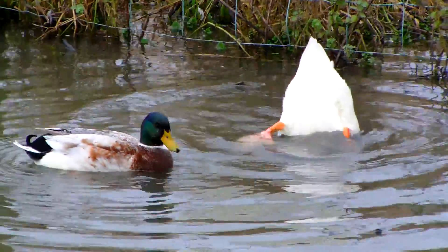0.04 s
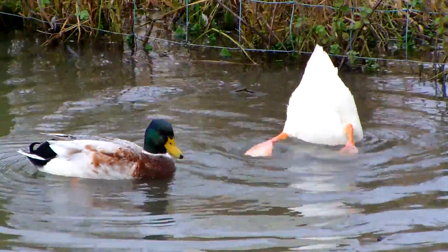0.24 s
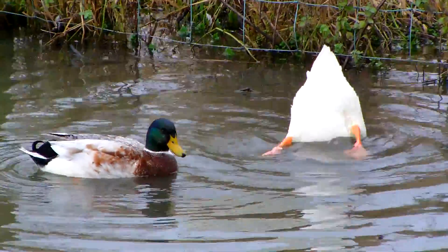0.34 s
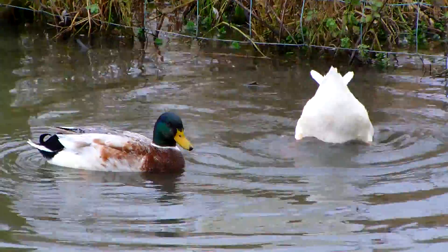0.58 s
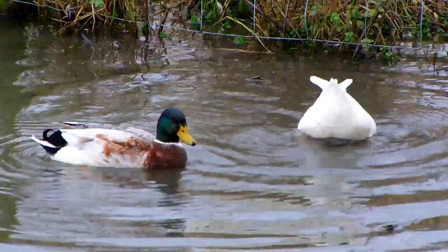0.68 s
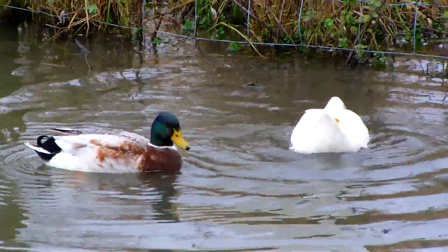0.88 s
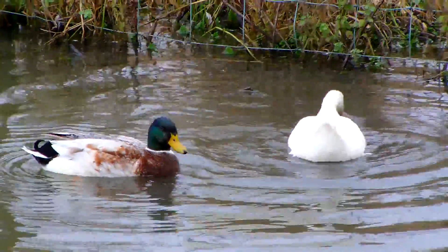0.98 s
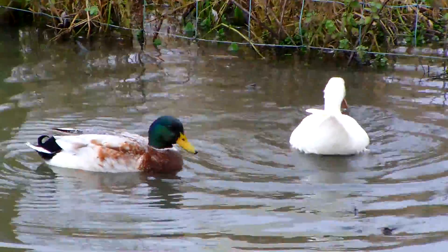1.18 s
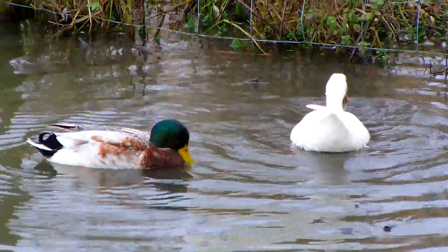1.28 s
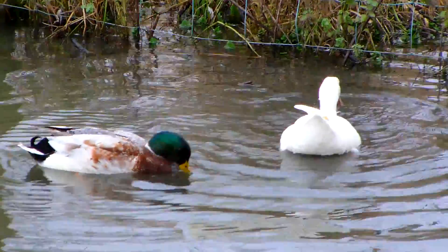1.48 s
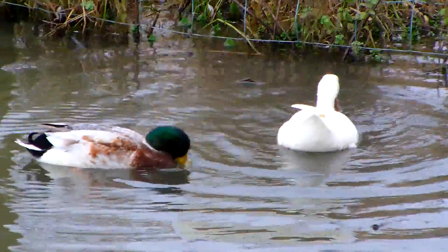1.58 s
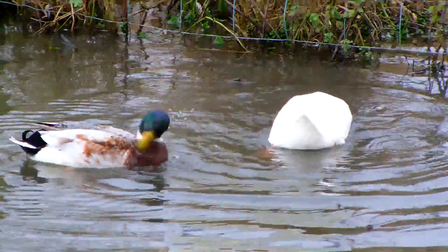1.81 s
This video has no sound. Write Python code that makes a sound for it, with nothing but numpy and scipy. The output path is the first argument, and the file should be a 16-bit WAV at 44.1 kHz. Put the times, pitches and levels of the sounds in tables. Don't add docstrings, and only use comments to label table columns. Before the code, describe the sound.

Single raspy duck call on a pond, echoing briefly, amid water splashes and faint distant birds

```python
import sys
import numpy as np
from scipy import signal
from scipy.fft import rfft, irfft
from scipy.io import wavfile
from scipy.ndimage import uniform_filter1d

SR = 44100
rng = np.random.default_rng(int(sys.argv[2]) if len(sys.argv) > 2 else 0)


def store_pcm(level_fs):
    pcm = np.round(np.clip(level_fs, -1, 1) * 32767).astype(np.int16)
    wavfile.write(sys.argv[1], SR, np.atleast_2d(pcm).T)


def rack_gain(trim_db):
    fader = np.asarray(trim_db, float)
    return 10 ** (fader / 20)


N = 81585

# (time [s], lowest pitch of warble [Hz], warble depth [share of pitch], level [dB],
# whistle resonance [dB])
CALL = [
    (.239, 640, .0, -60, -30),
    (.2445, 800, .2, -37.5, -28),
    (.274, 836, .178, -34.5, -14),
    (.304, 810, .16, -36.5, -8),
    (.365, 797, .1, -36, 1),
    (.392, 772, .05, -38.5, -2),
    (.436, 690, .02, -39.5, -1),
    (.447, 655, .0, -48, -8),
    (.475, 580, .0, -60, -30),
]
# (centre [Hz], width [Hz], level [dB])
THROAT = [(780, 400, -9), (1000, 300, -4.5), (1750, 900, -3), (2550, 450, -4), (3500, 700, -11),
          (4900, 450, -12), (5650, 550, -15), (7000, 1600, -20)]
# (centre [Hz], width [Hz], level [dB])
WHISTLE = [(2180, 450, -1), (13700, 4600, -26)]
# (centre [Hz], width [Hz], level [dB], opens [s], closes [s])
BILL = [(3500, 650, -8, .24, .385), (4850, 300, -13, .262, .398), (5650, 420, -9, .266, .395),
        (7500, 450, -9, .264, .3), (10800, 250, -16, .266, .28), (9720, 300, -10, .297, .322),
        (8780, 260, -1, .324, .45), (9500, 700, -15, .305, .41), (7000, 500, -16, .372, .41),
        (6550, 450, -13, .416, .434)]
# (centre [Hz], width [Hz], level [dB])
ECHO_COLOUR = [(780, 300, -5), (1420, 220, 0), (2200, 330, 5), (2200, 3000, -9), (8800, 1500, -3)]
# (time [s], rise [s], fade [s], level [dB])
SPLASHES = [
    (0, 0.0089, 0.054, -55),
    (0.133, 0.019, 0.74, -54),
    (.65, 0.02, 0.078, -63),
    (0.864, 0.0049, 0.026, -62.5),
    (1.0, 0.029, 0.13, -61.5),
    (1.385, 0.056, 0.16, -54),
    (1.8, 0.064, 0.39, -63),
]
# (frequency [Hz], level [dB per Hz])
SPLASH_COLOUR = [(300, -21.5), (1400, -11), (2300, -2.5), (3300, -4), (4800, -2.5), (8000, -1.5),
                 (9500, -7.5), (11500, -26)]
# (centre [Hz], width [Hz], level [dB])
FAR_CALL_BANDS = [(1090, 200, -4), (2200, 500, -1), (3200, 400, -1), (4650, 600, -2), (6800, 600, -3)]
# (time [s], pitch [Hz], ring [s], level [dB])
PLOPS = [(1.338, 1080, 0.04, -63.5), (1.348, 3150, .02, -60), (1.383, 3130, .022, -54),
         (1.374, 3400, .014, -57), (1.408, 2300, 0.025, -58), (.635, 1089, .03, -65),
         (.861, 5900, .004, -50), (.862, 7100, .003, -51), (.879, 5800, .004, -51), (.88, 6700, .003, -52),
         (.932, 7900, 0.004, -54), (1.762, 2120, 0.0071, -55.5), (1.797, 2500, 0.012, -60),
         (1.311, 1450, 0.004, -56), (1.343, 2350, 0.007, -56), (1.378, 6900, .007, -54),
         (1.386, 4800, .005, -53), (1.38, 2200, .006, -56), (1.46, 4600, .005, -56),
         (.797, 6300, .012, -60), (.868, 2050, .006, -58), (1.738, 6000, .008, -60),
         (1.834, 6000, .008, -59), (.017, 2100, .008, -58), (1.425, 4600, .012, -57),
         (.664, 3000, .02, -60), (.163, 3200, .016, -59), (.135, 3000, .012, -59), (.125, 6650, .008, -59),
         (1.349, 9700, .002, -55)]
# (time [s], pitch [Hz], level [dB])
COO = [
    (0.722, 669, -85),
    (.76, 787, -61),
    (0.783, 851, -68.5),
    (0.821, 739.6, -70),
    (0.859, 790, -68),
    (.96, 840, -72.5),
    (1.011, 799, -65),
    (1.09, 805, -74),
    (1.14, 795, -78),
]
# (time [s], length [s], top pitch [Hz], sag [Hz], level [dB])
PEEPS = [
    (1.48, .135, 4000, 45, -67),
    (1.752, .08, 4130, 130, -65.5),
    (1.18, .07, 610, 20, -72),
    (.61, .13, 3350, 60, -67),
    (.9, .1, 1950, 90, -68),
]
# (frequency [Hz], level [dB per Hz])
HISS_COLOUR = [(20, 8.5), (60, -8.5), (310, -18), (720, -5.5), (2200, -9), (7500, -8.5), (10500, -17),
               (15900, -20.5)]

WARBLE_TOP_S, WARBLE_HZ, WARBLE_RISE_HZ_PER_S2 = .256, 31.8, 300
WARBLE_SHARP, WARBLE_LEAN = 1.5, -.15
WARBLE_DIP_DB, WARBLE_DULL_DB, DULL_ABOVE_HZ = -1.5, -5, 4800
JITTER, ROUGH_ABOVE_HZ, SHIMMER_DB = .004, 9000, 1.8
BREATH_DB, WHEEZE_DB = -17, -12.5
CATCH_DB, CATCH_FROM_S, CATCH_SHARP = -7, .3, 14
BILL_EDGE_S = .003
ECHO_DB, ECHO_T60_S, ECHO_GAP_S = -12.5, .55, .014
DROPS_PER_S, DROPS_DB, DROP_CYCLES = 2000, -5, 9
HISS_DB = -59
NOTCH_HZ, NOTCH_WIDTH_HZ, NOTCH_DB = 905, 52, -19

SPECTRUM_HZ = np.arange(N // 2 + 1) * SR / N


def level(x, db):
    return x * rack_gain(db) / np.sqrt(np.mean(x ** 2))


def walk(rate):
    hold = int(SR / rate)
    steps = np.repeat(rng.standard_normal(N // hold + 1), hold)
    return 1.35 * uniform_filter1d(uniform_filter1d(steps, hold), hold)[:N]


def reshape(x, gain):
    return irfft(rfft(x) * gain, N)


def colour(x, points):
    hz, db = np.array(points).T
    f = np.maximum(SPECTRUM_HZ, 1)
    return reshape(x, rack_gain(np.interp(np.log(f), np.log(hz), db)))


def resonate(hz, peaks):
    return np.sqrt(sum(rack_gain(db) ** 2 / (1 + (2 * (hz - f) / w) ** 2) ** 2 for f, w, db in peaks))


def waterfowl(t):
    _, low, depth, db, whistle_db = (np.interp(t, np.array(CALL)[:, 0], c) for c in np.array(CALL).T)
    u = t - WARBLE_TOP_S
    turn = 2 * np.pi * (WARBLE_HZ * u + WARBLE_RISE_HZ_PER_S2 * u ** 3 / 3)
    swing = np.tanh(WARBLE_SHARP * (np.cos(turn) + WARBLE_LEAN))
    up = (swing - swing.min()) / np.ptp(swing)
    hz = low * (1 + depth * up + JITTER * walk(300))
    phase = 2 * np.pi * np.cumsum(hz) / SR

    opened = []
    for *_, opens, closes in BILL:
        outside = np.maximum(opens - t, t - closes) / BILL_EDGE_S
        opened.append(1 / (1 + np.exp(np.clip(outside, -30, 30))))
    catching = (t > CATCH_FROM_S) * (t < CALL[-3][0] - .02)
    catch_db = CATCH_DB * np.exp(CATCH_SHARP * (np.cos(turn) - 1)) * catching

    voice = 0
    for k in range(1, 23):
        f = k * hz
        gain = resonate(f, THROAT) + rack_gain(whistle_db) * resonate(f, WHISTLE)
        gain = gain * rack_gain(WARBLE_DULL_DB * up / (1 + (DULL_ABOVE_HZ / f) ** 4))
        for is_open, row in zip(opened, BILL):
            if abs(row[0] / k - 830) < 330:
                gain = gain + is_open * resonate(f, [row[:3]])
        gain = gain * rack_gain(catch_db + SHIMMER_DB * walk(148.3)) * (f < .45 * SR)
        roughness = (f / ROUGH_ABOVE_HZ) ** 2 * walk(500)
        voice = voice + gain * np.sin(k * phase + rng.uniform(0, 2 * np.pi) + roughness)

    breath = reshape(rng.standard_normal(N), resonate(SPECTRUM_HZ, THROAT[2:]))
    air = rng.standard_normal(N)
    wheeze = 0
    for is_open, row in zip(opened, BILL):
        wheeze = wheeze + is_open * level(reshape(air, resonate(SPECTRUM_HZ, [row[:3]])), row[2])
    breath = level(breath, BREATH_DB) * rack_gain(WARBLE_DULL_DB * up / 2) + wheeze * rack_gain(WHEEZE_DB)
    puffs = 1 + np.cos(phase)
    calling = (t > CALL[0][0]) & (t < CALL[-1][0])
    return (voice + breath * puffs) * rack_gain(db + WARBLE_DIP_DB * up) * calling


def banks(x, t):
    fade = rack_gain(-60 * t / ECHO_T60_S) * np.clip(t / ECHO_GAP_S - 1, 0, 1)
    tail = rng.standard_normal(N) ** 3 * fade
    echo = signal.fftconvolve(x, tail / np.sqrt(np.sum(tail ** 2)))[:N]
    return rack_gain(ECHO_DB) * reshape(echo, resonate(SPECTRUM_HZ, ECHO_COLOUR))


def bubble(hz, ring_s, gain):
    u = np.arange(int(2 * ring_s * SR)) / SR
    tone = np.sin(2 * np.pi * hz * u * (1 + .025 * u / ring_s))
    return gain * tone * np.exp(-2.5 * u / ring_s) * np.minimum(u / .0015, 1)


def add(out, s, x):
    i = int(s * SR)
    out[i:i + len(x)] += x[:N - i]


def splashes(t):
    swell = 0
    for s, rise, fade, db in SPLASHES:
        shape = np.where(t < s, np.exp(-((t - s) / rise) ** 2), np.exp(-(t - s) / fade))
        swell = swell + rack_gain(db) * shape
    drops = np.zeros(N)
    for when, pitch, size in rng.random((int(DROPS_PER_S * N / SR), 3)):
        hz = 900 * 11 ** pitch
        add(drops, when * N / SR, bubble(hz, DROP_CYCLES / hz, rack_gain(6 * size ** 2) * np.sqrt(hz)))
    spray = rng.standard_normal(N) + level(drops, DROPS_DB)
    spray = reshape(spray, .5 + resonate(SPECTRUM_HZ, FAR_CALL_BANDS))
    return level(colour(spray, SPLASH_COLOUR), 0) * swell * rack_gain(1.2 * walk(30))


def plops():
    out = np.zeros(N)
    for s, hz, ring_s, db in PLOPS:
        add(out, s, bubble(hz, ring_s, 2 * rack_gain(db)))
    return out


def far_birds(t):
    s, hz, db = np.array(COO).T
    coo_db = np.interp(t, s, db, -120, -120) + 3 + 1.2 * walk(40)
    out = np.sin(2 * np.pi * np.cumsum(np.interp(t, s, hz)) / SR) * rack_gain(coo_db)
    for s, length, top, sag, db in PEEPS:
        u = np.clip((t - s) / length, 0, 1)
        hz = top - sag * (2.7 * u - 1.1) ** 2
        peep = np.sin(2 * np.pi * np.cumsum(hz) / SR) * np.sin(np.pi * u) ** .5
        out = out + peep * rack_gain(db + 3 + 1.2 * walk(60))
    return out


def water_and_wind():
    noise = rfft(colour(rng.standard_normal(N), HISS_COLOUR))
    octave = np.log2(np.maximum(SPECTRUM_HZ, 1) / 16)
    out = 0
    for k in range(11):
        flicker = rack_gain(.6 * walk(4) + 1.3 * walk(18))
        out = out + flicker * irfft(noise * np.clip(1 - abs(octave - k), 0, 1), N)
    above = signal.sosfilt(signal.butter(2, 300, "high", fs=SR, output="sos"), out)
    return out * rack_gain(HISS_DB) / np.std(above)


def scene():
    t = np.arange(N) / SR
    call = waterfowl(t)
    mono = call + banks(call, t) + water_and_wind() + splashes(t) + plops() + far_birds(t)
    return np.array([mono, mono])


def roll_off(x):
    return signal.sosfilt(signal.butter(12, 16040, fs=SR, output="sos"), x)


def record(dry):
    dip = rack_gain(NOTCH_DB / (1 + (2 * (SPECTRUM_HZ - NOTCH_HZ) / NOTCH_WIDTH_HZ) ** 2))
    mix = reshape(dry, dip)
    return roll_off(mix)


dry = scene()
out = record(dry)
store_pcm(out)
```